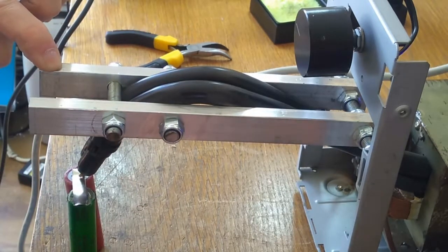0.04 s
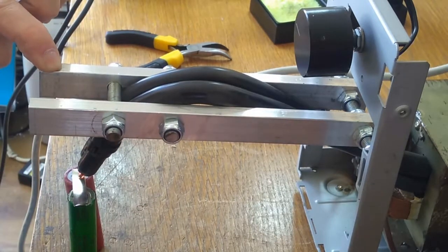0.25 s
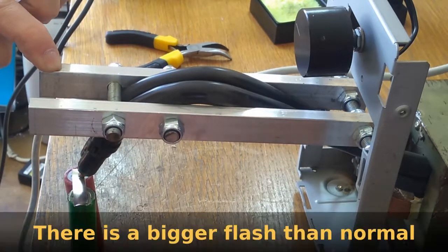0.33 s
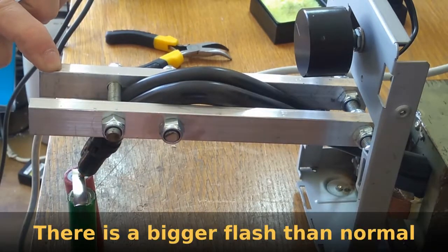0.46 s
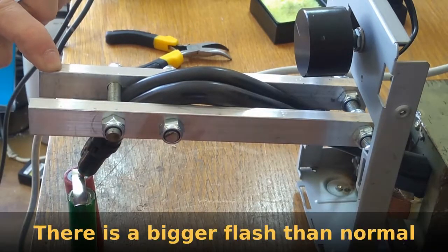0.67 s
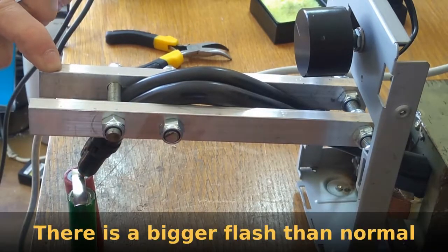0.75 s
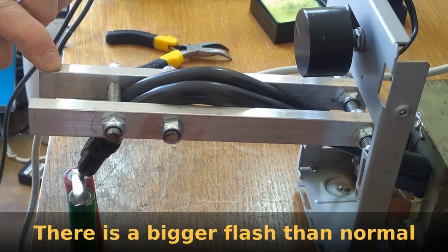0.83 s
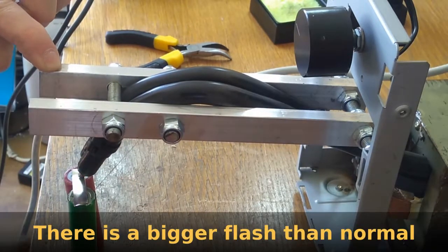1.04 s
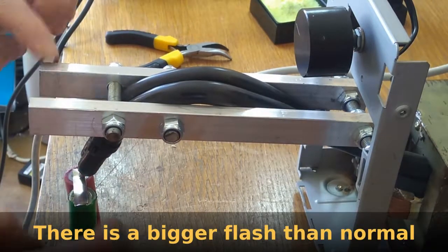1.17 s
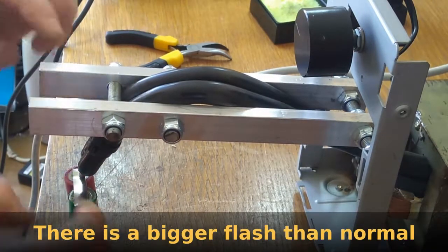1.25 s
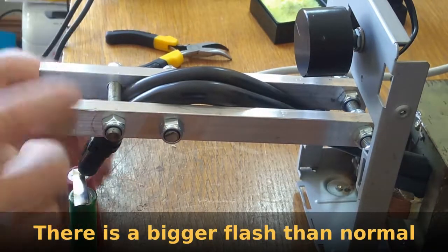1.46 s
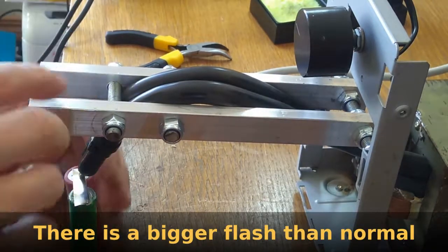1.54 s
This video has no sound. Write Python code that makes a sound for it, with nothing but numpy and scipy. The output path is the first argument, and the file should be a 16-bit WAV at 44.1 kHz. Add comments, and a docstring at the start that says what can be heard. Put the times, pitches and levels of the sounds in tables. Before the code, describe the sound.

One sharp spark crack comes from a nearby spot welder, its metal arms ringing and its transformer buzzing for a moment. The small room echoes briefly, then come a faint hissing rustle and a few soft touches over low background noise.

```python
"""A sharp snap comes first: a homemade spot welder sparks, its metal arms ring and the wooden bench thuds.
The transformer buzzes for the fifth of a second that the current flows, and a small room echoes.
A faint high rustle and a few soft touches follow over the room's steady background noise.
An automatic volume control dips after the snap and turns quiet sounds down further."""
import sys
import numpy as np
from scipy import signal
from scipy.fft import rfft, irfft, next_fast_len
from scipy.io import wavfile
from scipy.ndimage import uniform_filter1d, minimum_filter1d

SR = 44100
rng = np.random.default_rng(int(sys.argv[2]) if len(sys.argv) > 2 else 0)


def master_out(mix):
    """Clip the mix to full scale and print it as 16-bit PCM to the path in sys.argv[1]."""
    frames = np.transpose(np.atleast_2d(mix))
    ceiling = np.clip(frames, -1, 1)
    pcm = np.round(ceiling * 32767).astype(np.int16)
    wavfile.write(sys.argv[1], SR, pcm)


N = 70560  # 1.6 s


# Levels in the tables are relative. A "tone" table says how strong each frequency is.
# the spark's cracks, then the weld's later spits: t/s, level/dB
CRACKS = [(0.2146, -7), (0.2163, -2.5), (0.2206, -7.5), (.2211, -21.5)]
SPITS = [(.2490, -38), (.2528, -28)]
# tone of a crack's pop, of its sizzle and of a spit: f/Hz, level/dB
POP_TONE = [(60, -46), (250, -15.5), (700, 3), (1150, 4), (1900, -23), (4000, -17), (7000, -25.5),
            (10000, -22.5), (16000, -31)]
SIZZLE_TONE = [(1000, -21.5), (2500, -7), (3900, 6.5), (5800, 2), (7000, -12), (10200, -6.5), (12500, -19),
               (16000, -25.5)]
SPIT_TONE = [(2000, -27), (4000, 0.5), (5800, 5.5), (8000, -6), (11000, -4.5), (15500, -17)]

def spark():
    """Each crack shoves the air, making a pop with a short sizzle; then the weld spits."""
    kicks = np.zeros(N)
    for start, db in CRACKS:
        kicks[round(start * SR)] += amp(db + 16.5)
    pops = filtered(kicks, lambda hz: amp(along(POP_TONE, hz)), causal=True)
    sizzle = amp(-12) * puffs(CRACKS, SIZZLE_TONE, fade_s=.014)
    spits = puffs(SPITS, SPIT_TONE, fade_s=.027)
    return pops + pan(right_db=5) * (sizzle + spits)


# notes of the arms: f/Hz, level/dB, fade/s (a fade is the time to drop by 60 dB)
ARM_NOTES = [(360, -23, .1), (614, -29, .06), (709, -19, 0.091), (786, -23, 0.092), (832, -22, .1),
             (1167, -15, .055), (1383, -36, .15), (3395, -38.5, 0.12), (3850, -27.5, .07),
             (5020, -36.5, .06), (5770, -35, 0.16)]

def electrode_arms():
    """The strongest crack sets the welder's metal arms ringing."""
    strongest_s, _ = max(CRACKS, key=lambda row: row[1])
    return ring(ARM_NOTES, strongest_s, rise_s=.0003)


# notes of the bench: f/Hz, level/dB, fade/s
BENCH_NOTES = [(127.2, -19.5, .42), (251.7, -32.5, 0.57), (335, -28, 0.23), (378.5, -26.5, .3),
               (398.5, -26.5, .3), (440.5, -33.5, .36), (541.4, -38, .4), (597, -24, .3), (617, -36, .25),
               (716, -31.5, 0.23), (716, -31.5, .25), (834, -33, .35), (1109, -33.5, .3)]
# jolts of the welder's frame: t/s, level/dB
JOLTS = [(.2715, -29.5), (.2770, -32)]
# tone of a jolt: f/Hz, level/dB
JOLT_TONE = [(70, -27), (150, -2.5), (260, 1), (420, 2.5), (800, -11), (1200, -4), (1800, -27.5),
             (5000, -59.5), (15000, -74)]

def bench():
    """The wooden bench thuds from the kick, and the current jolts the frame standing on it."""
    thud = ring(BENCH_NOTES, start=.218, rise_s=.018)
    return thud + puffs(JOLTS, JOLT_TONE, fade_s=.16)


# tone of the rattling frame: f/Hz, level/dB
RATTLE_TONE = [(70, -21.5), (170, -5.5), (320, 8.5), (700, -8), (1350, -7), (1900, -26.5), (3600, -19.5),
               (6000, -42.5), (15000, -75)]

def transformer():
    """While current flows, the core hums and the frame rattles, twice per cycle of the mains power."""
    on_s, off_s, release_s = .222, .42, .041
    mains_hz, sag_db_per_s = 50, 33
    t = since(on_s)
    current = strike(on_s, rise_s=.003, fade_s=60 / sag_db_per_s)
    current *= np.exp(-since(off_s) / release_s)
    pull = np.sin(2 * np.pi * 2 * mains_hz * t)
    hum = amp(-36.5) * pull
    rattle = noise(RATTLE_TONE) * (1 + .77 * pull)
    rattle *= amp(-31 - 16 * t)  # fades faster than the hum
    return current * (hum + rattle)


# tone of the echo: f/Hz, level/dB
ECHO_TONE = [(40, -33), (90, -5.5), (200, 2), (400, -1), (750, 0.5), (1200, -9.5), (1700, -18),
             (2800, -17.5), (3800, -15), (5600, -16), (7500, -19), (10500, -24), (13500, -31),
             (15500, -41.5)]
# how long the echo lasts: f/Hz, fade/s
ECHO_FADES = [(100, .75), (400, 0.44), (1200, .5), (4000, .46), (9000, .35), (15000, .23)]

def room_echo():
    """The room answers the snap with a wash of noise; each frequency dies at its own speed."""
    start, rise_s = .218, .003
    hz, t, bands = signal.stft(noise(ECHO_TONE), SR, nperseg=256)
    fade = amp(-60 * np.maximum(t - start, 0) / along(ECHO_FADES, hz)[:, None])
    tail = signal.istft(bands * fade, SR, nperseg=256)[1][:, :N]
    rise = 1 - np.exp(-since(start) / rise_s)
    return amp(-23) * tail * rise


# how the hiss and its thin high ring swell and fade: t/s, level/dB
HISS_SWELL = [(.52, -99.5), (.65, -82), (.70, -65.5), (.80, -64.5), (.86, -72), (.92, -78.5), (.96, -75),
              (1.02, -92.5)]
SHEEN_SWELL = [(.5, -94), (.58, -75), (.61, -68.5), (.71, -65.5), (.81, -69), (.88, -70.5), (.92, -76),
               (.97, -72.5), (1.02, -100)]
# tone of the hiss: f/Hz, level/dB
HISS_TONE = [(1800, -27.5), (2600, -10), (3100, 1.5), (4000, -5.5), (4700, -12.5), (5400, -1.5), (6250, 0),
             (7200, -6.5), (9500, 1.5), (11500, -7.5), (14500, -14), (16000, -25.5)]

def rustle():
    """A faint hiss comes and goes, with a sheen: a narrow band of high, ringing noise."""
    sheen_hz, width_hz = 8590, 900
    swell = lambda rows: amp(np.interp(since(0), *np.transpose(rows)))
    peak = lambda hz: 1 / (1 + (2 * (hz - sheen_hz) / width_hz) ** 2)
    sheen = swell(SHEEN_SWELL) * unit(filtered(rng.standard_normal((2, N)), peak))
    hiss = swell(HISS_SWELL) * noise(HISS_TONE)
    return amp(10) * pan(right_db=7) * (hiss + sheen)


# touches on the bench and the tool: t/s, f/Hz, level/dB, fade/s
TOUCHES = [(0.507, 125, -50, 0.15), (1.335, 3520, -56, 0.047), (1.360, 122, -61, 0.17)]

def touches():
    """Two soft bumps and a small tick each ring one short note."""
    notes = sum(ring([note], start, rise_s=.0052) for start, *note in TOUCHES)
    return amp(7.5) * notes


# tone of the background: f/Hz, level/dB
BACKGROUND_TONE = [(35, -18.5), (70, -1), (120, 1), (165, -2.5), (200, 4), (235, -4.5), (400, -4.5),
                   (1100, -11), (1700, -12.5), (1880, -13.5), (2100, -17.5), (3600, -16.5), (6000, -19.5),
                   (13000, -26.5), (15500, -31)]
# how alike its left and right are: f/Hz, likeness (1 the same, -1 opposite)
BACKGROUND_LIKENESS = [(60, -0.81), (150, -0.9), (380, -.05), (950, 0.99), (1900, -.45), (3000, 0),
                       (15000, 0.18)]

def background():
    """Soft, even room noise and a weak electrical drone."""
    drone_hz = 198.5
    drone = np.sin(2 * np.pi * drone_hz * since(0))
    return amp(-58.5) * noise(BACKGROUND_TONE, BACKGROUND_LIKENESS) + amp(-75.5) * drone


# how alike left and right are in the other noises: f/Hz, likeness
USUAL_LIKENESS = [(100, .8), (300, -0.22), (1400, .85), (3000, -.15), (7000, -0.34), (15000, 0)]

def noise(tone, likeness=USUAL_LIKENESS):
    """Stereo noise with the given tone and an average power of 1."""
    def gains(hz):
        spread = np.arccos(np.clip(along(likeness, hz), -1, 1)) / 2
        return amp(along(tone, hz)) * [np.cos(spread), np.sin(spread)]
    mid, side = filtered(rng.standard_normal((2, N)), gains)
    return unit(np.array([mid + side, mid - side]))


def puffs(events, tone, fade_s):
    """Short puffs of noise that start sharply."""
    return noise(tone) * sum(amp(db) * strike(start, .00014, fade_s) for start, db in events)


def ring(notes, start, rise_s):
    """A struck object: pure notes start together and each dies away."""
    t = np.arange(SR // 2) / SR
    wave = sum(amp(db - 60 * t / fade_s) * np.sin(2 * np.pi * hz * t) for hz, db, fade_s in notes)
    wave *= 1 - np.exp(-t / rise_s)
    return np.pad(wave, (round(start * SR), N))[:N]


def strike(start, rise_s, fade_s):
    """A loudness curve that rises and dies away."""
    t = since(start)
    return (1 - np.exp(-t / rise_s)) * amp(-60 * t / fade_s)


def filtered(x, gain, causal=False):
    """Turn each frequency up or down; if causal, nothing rings ahead of the sound."""
    size = 2 * next_fast_len(N // 2 + 4096)
    response = gain(np.fft.rfftfreq(size, 1 / SR))
    if causal:  # move the early ringing to after the sound (minimum phase)
        cepstrum = irfft(np.log(np.maximum(response, 1e-6)))
        cepstrum[1:size // 2] *= 2
        cepstrum[size // 2 + 1:] = 0
        response = np.exp(rfft(cepstrum))
    return irfft(rfft(x, size) * response, size)[..., :N]


def amp(db):
    """Turn decibels into a multiplier."""
    return np.exp(np.maximum(db, -300) * np.log(10) / 20)


def unit(x):
    """Scale to an average power of 1."""
    return x / np.sqrt(np.mean(x ** 2) + 1e-20)


def along(table, hz):
    """Read between a table's rows, on a pitch-like scale."""
    freqs, values = np.transpose(table)
    return np.interp(np.log(hz + 1), np.log(freqs + 1), values)


def since(start):
    """Seconds since a moment, zero before it."""
    return np.maximum(np.arange(N) / SR - start, 0)


def pan(right_db):
    """Left and right multipliers that make the right louder by right_db."""
    return amp(np.array([[-right_db], [right_db]]) / 2)


def scene():
    """The weld, then the small sounds after it, over the background."""
    weld = spark() + electrode_arms() + bench() + transformer() + room_echo()
    return weld + rustle() + touches() + background()


# bands that sound wide: f/Hz, half width/Hz, level kept in the middle/dB
WIDE_BANDS = [(2303, 218, -18), (4530, 150, -9)]

def widen(x):
    """In two narrow bands the middle moves to the sides, so left and right oppose each other."""
    def kept(hz):
        dips_db = sum(db * np.exp(-((hz - centre) / width) ** 4) for centre, width, db in WIDE_BANDS)
        return np.minimum(amp(dips_db), 1)
    mid, side = (x[0] + x[1]) / 2, (x[0] - x[1]) / 2
    side = side + filtered(mid, lambda hz: np.sqrt(1 - kept(hz) ** 2))
    mid = filtered(mid, kept, causal=True)
    return np.array([mid + side, mid - side])


def volume_control(x):
    """Turn quiet sound down, and hold the volume lower for a while after a loud peak."""
    loud_db, quiet_db, softness_db, hold_s = -25.5, -42, 2, .64
    power = uniform_filter1d(np.mean(x ** 2, axis=0), size=500)
    level_db = 10 * np.log10(np.abs(power) + 1e-12)
    # a soft step from 0.25 below the limit to 1.25 above it
    above = lambda limit_db: (1.5 + np.tanh((level_db - limit_db) / softness_db / 2)) / 2
    hold = 2 * round(hold_s * SR / 2) + 1
    dip_db = minimum_filter1d(-3 * above(loud_db), hold, origin=hold // 2, mode="nearest")
    hush_db = -7.5 * (1 - above(quiet_db))
    return x * amp(uniform_filter1d(dip_db, size=1000) + hush_db)


def record(dry):
    """Widen the sound, cut the deep bass, control the volume and cut the highest treble."""
    bottom_hz, top_hz = 78, 15800
    bass_cut = signal.butter(5, bottom_hz, "highpass", fs=SR, output="sos")
    x = volume_control(signal.sosfilt(bass_cut, widen(dry)))
    return filtered(x, lambda hz: 1 / (1 + (hz / top_hz) ** 100))


dry = scene()
out = record(dry)
master_out(out)
```